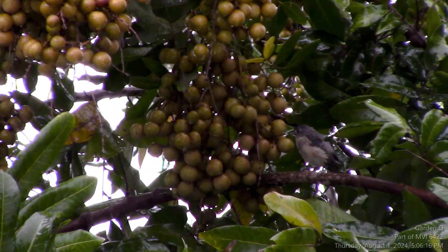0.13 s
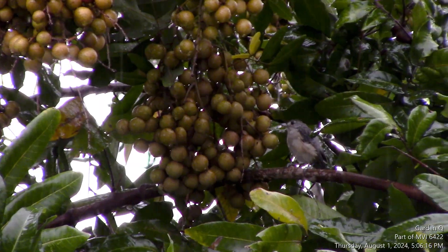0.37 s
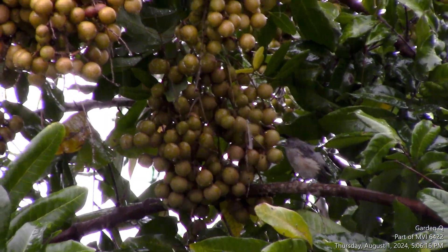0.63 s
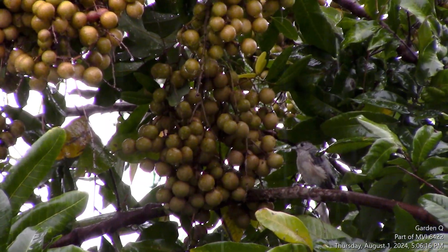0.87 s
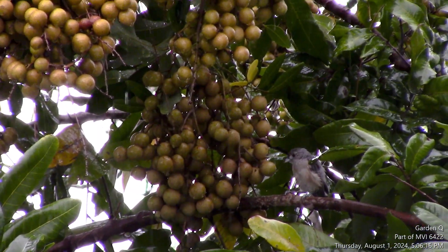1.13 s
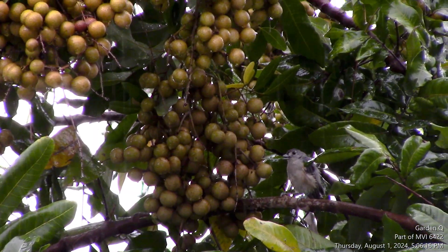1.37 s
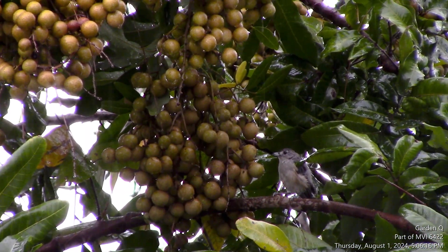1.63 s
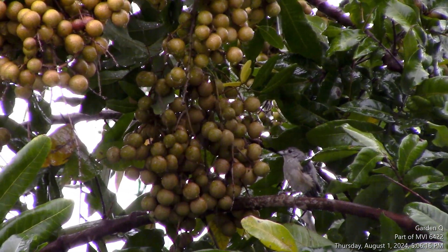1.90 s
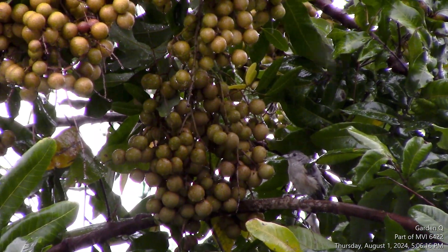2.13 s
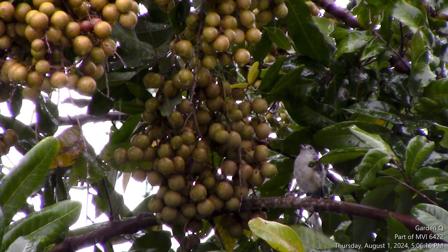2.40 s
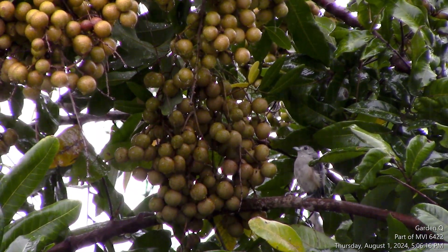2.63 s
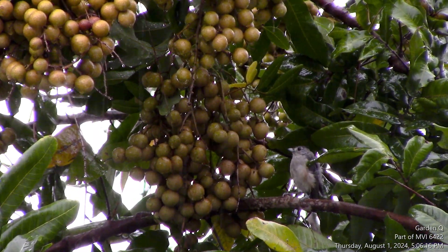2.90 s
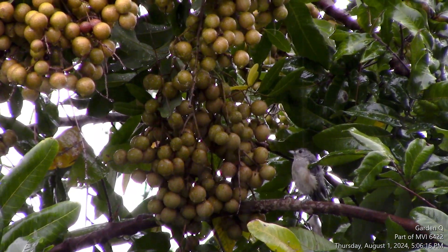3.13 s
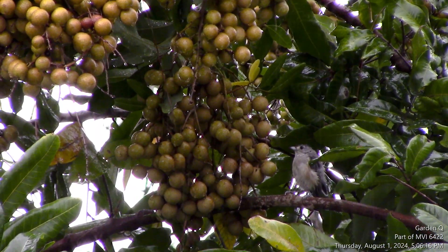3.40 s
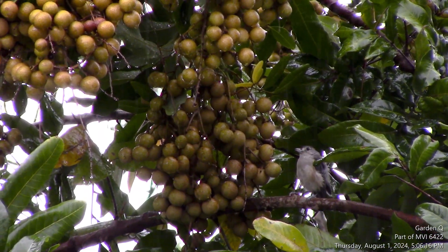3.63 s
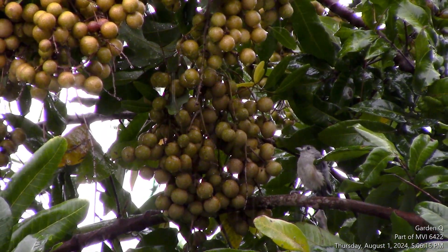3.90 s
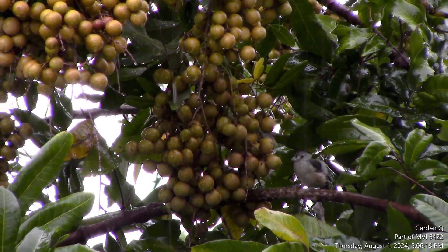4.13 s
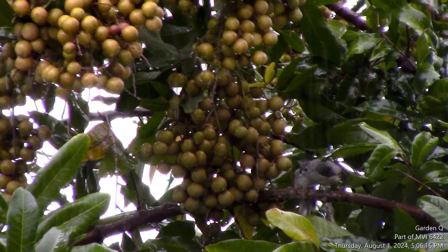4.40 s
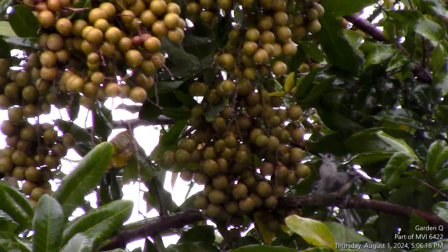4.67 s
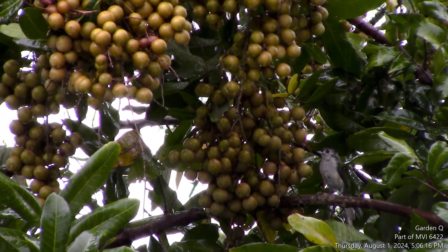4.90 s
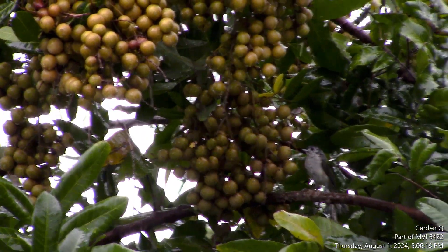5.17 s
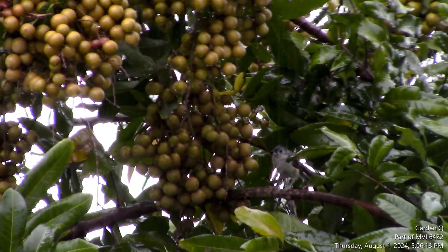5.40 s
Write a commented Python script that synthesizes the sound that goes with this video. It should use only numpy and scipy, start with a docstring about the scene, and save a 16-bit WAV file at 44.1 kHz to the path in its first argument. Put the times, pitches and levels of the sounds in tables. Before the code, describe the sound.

A small bird gives sharp, high falling chips and one brief thin whistle over steady light rain hissing on leaves in a yard.

```python
"""After a short silence, light rain on foliage fades in: a hiss of noise and grains, surging in octave bands.
Under it lies a faint low drone, noise through narrow resonances. Drops soon tick on near leaves, clicks
with a spray of echoes. From about two seconds a small bird in a fruit tree gives high chips, falling
whistles with a weak octave that echo off the walls and leaves of a yard; one long whistle comes among
the last of them. A final chip and a few more drops follow over the rain."""
import sys
import numpy as np
from scipy import signal
from scipy.fft import rfft, irfft, next_fast_len
from scipy.io import wavfile
from scipy.ndimage import uniform_filter1d

SR = 44100
rng = np.random.default_rng(int(sys.argv[2]) if len(sys.argv) > 2 else 0)


def generate_wav(sig):
    """Save sig (samples, or channels by samples) to the path in sys.argv[1] as 16-bit PCM at SR."""
    pcm = np.round(np.clip(np.atleast_2d(sig).T, -1, 1) * 32767).astype(np.int16)
    wavfile.write(sys.argv[1], SR, pcm)


def boost_factor(decibels):
    """Convert a level in decibels to a linear amplitude factor."""
    exponent = np.asarray(decibels, float) / 20
    return 10 ** exponent


N = 243873

# Wavering tones of far machinery: f/Hz, width/Hz, rms level/dB
DRONE_TONES = [(143, 7, -89), (226, 13.6, -72.5), (246.5, 13.4, -72.5), (367.5, 17, -75)]
# Swells of the rain, before the final 3 dB lift: t/s, level/dB
RAIN_SWELLS = [(0.15, -47.5), (0.40, -47.5), (0.514, -49.5), (0.60, -46.5), (0.68, -49), (0.77, -47.5),
               (1.04, -49), (1.16, -47), (1.28, -49), (1.47, -47), (1.67, -48), (2.0, -48.5), (2.11, -46.5),
               (2.21, -49), (2.31, -48), (3.14, -48), (3.77, -48.5), (3.91, -49), (4.25, -47.5),
               (4.44, -49), (4.73, -47), (5.07, -48.5), (5.22, -47), (5.35, -49), (5.53, -48)]
# Spectrum of the rain, relative density: f/Hz, level/dB per Hz
RAIN_SPECTRUM = [(30, -25), (80, -26), (130, -20), (210, -11), (300, -5), (560, -3.5), (620, -0.5),
                 (1040, -2.5), (1590, -1), (3000, -2), (6550, -7.5), (9500, -15.5), (12500, -25.5),
                 (15600, -32)]
# Stereo width of the rain: f/Hz, left-right likeness/0-1
RAIN_LIKENESS = [(60, 0.06), (150, 0.88), (380, 0.77), (950, 0.81), (2380, 0.79), (5980, 0.68),
                 (15000, 0.21)]
# Stereo balance of the rain: f/Hz, left over right/dB
RAIN_BALANCE = [(60, -3), (110, 0.5), (200, 1), (380, 1.5), (700, 1.5), (1290, 1.5), (2380, 2), (4400, 0),
                (8120, 0), (15000, 3)]
# Drops on near leaves, before softening and ringing: t/s, click level/dB, left over right/dB, softness/0-1
LEAF_DROPS = [(0.605, -35, 5, 0.76), (0.745, -35, -1, 0.5), (1.74, -37, 0, 0.7), (2.104, -36, 1.5, 0.7),
              (2.118, -35, -1, 0.67), (2.302, -38, 9, .6), (2.8005, -41, 21, 0.4), (5.101, -48, 5, .4),
              (5.2434, -34, 16, 0.2), (5.261, -34, 4, 0.8), (5.268, -36, 4, 0.7), (5.400, -42, 5, 0.4)]
# Ring of a struck leaf, before a common 9.5 dB lift: f/Hz, width/Hz, level/dB
LEAF_RING = [(2700, 1000, 0), (6240, 2200, 9), (9200, 1400, 7), (13000, 4000, -30)]
# Echo envelope of the yard, near leaves then walls further off: t after the sound/s, relative level/dB
YARD_ECHO = [(.003, -30), (.007, 1.5), (.018, -1.5), (.032, -4), (.050, -7.5), (.070, -12), (.088, -13.5),
             (.105, -22), (.3, -52)]
# Short chips: start t/s, rise/s, hold/s, level at the top of the swell/dB, settled f/Hz, fall in f/Hz
BIRD_CHIPS = [(2.143, 0.0116, 0.024, -30, 7510, 730), (2.613, .009, 0.016, -30, 7380, 475),
              (2.838, 0.017, 0.0056, -36.5, 7040, 120), (2.997, 0.017, 0.009, -43, 5706, 90),
              (3.512, 0.0098, 0.011, -36.5, 7440, 620), (4.13, 0.013, 0.019, -28, 7503, 690),
              (5.018, 0.0085, .008, -50, 6940, 100)]
# One long whistle: t/s, f/Hz, level/dB
WHISTLE = [(4.531, 8000, -53), (4.540, 7970, -40), (4.553, 8040, -32.5), (4.562, 8040, -34.5),
           (4.579, 7950, -32.5), (4.592, 7920, -39), (4.604, 7800, -33.5), (4.615, 7700, -40),
           (4.622, 7600, -49), (4.631, 7300, -52)]
# The bird turns on its branch: t/s, left over right/dB
BIRD_BALANCE = [(2.15, 2.5), (3.0, 1.5), (3.52, -1), (4.14, 2.5), (4.55, -1.5)]


def rms_one(x):
    """Scale to rms 1."""
    return x / np.sqrt(np.mean(x ** 2) + 1e-20)


def at_hz(points, hz):
    """Read a table on a log-frequency axis."""
    table_hz, values = np.transpose(points)
    return np.interp(np.log(hz), np.log(np.maximum(table_hz, 1)), values)


def pan(left_db):
    """Left and right gains for a balance in dB, left over right."""
    return boost_factor(np.array([[left_db / 2], [-left_db / 2]]))


def drift(rate_hz):
    """Slow chance: noise at every 20th sample through a double one-pole low-pass, scaled to rms 1."""
    r = np.exp(-40 * np.pi * rate_hz / SR)
    noise = rng.standard_normal(N // 20 + 2002)
    slow = signal.lfilter([1], [1, -2 * r, r * r], noise)[2000:]  # drop the filter's start-up
    return np.interp(np.arange(N) / 20, np.arange(len(slow)), rms_one(slow))


def resonance(x, hz, width_hz):
    """Two-pole band-pass with gain about 1 on top."""
    r = np.exp(-np.pi * width_hz / SR)
    poles = [1, -2 * r * np.cos(2 * np.pi * hz / SR), r * r]
    return signal.lfilter([(1 - r * r) / 2, 0, (r * r - 1) / 2], poles, x)


def yard_echoes(echo_db):
    """Densely scattered reflections, drawn anew for each sound, with total energy about echo_db per side."""
    echoes_per_s = 12000
    t = np.arange(SR // 3) / SR
    hits = rng.random((3, len(t))) < echoes_per_s / SR
    taps = rng.standard_normal((3, len(t))) * hits
    taps = taps[0] + taps[1:]  # the first row reaches both sides alike
    shape = boost_factor(np.interp(t, *np.transpose(YARD_ECHO)))
    return boost_factor(echo_db) * taps * shape / np.sqrt(np.sum(shape ** 2) * np.mean(taps ** 2))


def drone():
    """Far machinery: noise through narrow resonances gives a few wavering low tones."""
    tones = [boost_factor(db) * rms_one(resonance(rng.standard_normal(N), hz, width_hz))
             for hz, width_hz, db in DRONE_TONES]
    return sum(tones)


def rain(grains_per_s, grain_db, grain_share, surge_db, patch_db):
    """Far rain is smooth noise, nearer rain dense grains; octave bands surge partly together."""
    gust_db, gusts_per_s = -0.1, 2.4  # quicker swells at random
    level_db = np.interp(np.arange(N) / SR, *np.transpose(RAIN_SWELLS)) + gust_db * drift(gusts_per_s)
    swell_db = level_db - level_db.mean()
    treble_db = 1.05 - 0.51 * swell_db  # the top octaves are lifted and follow less of each swell

    size = next_fast_len(N)
    sizes = boost_factor(grain_db * np.minimum(rng.exponential(1, (2, size)), 5)) * rng.choice([-1, 1], (2, size))
    grains = rms_one(sizes * (rng.random((2, size)) < grains_per_s / SR))
    share = np.clip(grain_share, 0, 1)  # of the power
    smooth = rng.standard_normal((2, size))
    mid, side = rfft(np.sqrt(1 - share) * smooth + np.sqrt(share) * grains)

    hz = np.maximum(np.arange(len(mid)) * SR / size, 1)
    alike = np.clip(at_hz(RAIN_LIKENESS, hz), 0, 1)
    stereo = np.sqrt(1 + alike) * mid + np.sqrt(1 - alike) * side * [[1], [-1]]
    stereo = stereo * boost_factor(at_hz(RAIN_SPECTRUM, hz)) * boost_factor(at_hz(RAIN_BALANCE, hz) * [[.5], [-.5]])

    surge = surge_db * (drift(28) + 0.44 * drift(90))
    centres = 62.5 * 2. ** np.arange(9)
    octave = np.log2(np.clip(hz, centres[0], centres[-1]) / centres[0])
    out = 0
    for k, centre in enumerate(centres):
        slopes = np.clip(1 - abs(octave - k), 0, 1)  # overlapping slopes add up to one
        band = irfft(stereo * slopes, size)[:, :N]
        wet = np.clip(np.log2(centre / 120) / 3, 0, 1)  # the bass is distant and does not surge
        bright = np.clip(np.log2(centre / 4000), 0, 1)
        patch = patch_db * drift(11.0)  # each band also wavers by itself
        out = out + band * boost_factor(wet * (swell_db + surge) + bright * treble_db + patch)
    return boost_factor(level_db.mean() + 3.0) * rms_one(out)


def drops(echo_db, spray_t60):
    """A drop ticks on a leaf, a soft one more dully; a short spray of echoes follows, duller than the tick."""
    soft_spray_loss_db = 18  # a fully soft drop splashes this much less
    out = np.zeros((2, N + SR))
    for start_s, click_db, left_db, softness in LEAF_DROPS:
        hit = yard_echoes(echo_db - soft_spray_loss_db * softness)
        decay = boost_factor(-60 * np.arange(hit.shape[1]) / SR / spray_t60)
        hit = signal.lfilter([.3, .4, .3], [1], hit * decay)
        hit[:, 0] = -pan(left_db)[:, 0]  # the tick itself
        soft = np.clip(softness, 0, .9)
        hit = signal.lfilter([1], np.convolve([1, -soft], [1, -soft]), (1 - soft) * hit)
        start = round(start_s * SR)
        out[:, start:start + hit.shape[1]] += boost_factor(click_db) * hit
    return sum(boost_factor(db + 9.5) * resonance(out[:, :N], hz, width_hz) for hz, width_hz, db in LEAF_RING)


def chip_shape(start, rise, hold, top_db, settled_hz, fall_hz):
    """Time, pitch and level of a chip: it swells while the pitch falls, sags, and ends with a last drop."""
    onset_db, onset_bend = -52, 1.04  # every chip climbs from this level on a bent slope
    sag_db_per_s, release_s, release_db = 400, 0.008, -9
    t = np.arange(round((rise + hold + release_s) * SR)) / SR
    release = np.clip((t - rise - hold) / release_s, 0, 1)

    # the pitch lingers on top, falls, goes on sinking slowly, then drops; all as shares of the fall
    glide = np.exp(-(t / (0.79 * rise)) ** 2.5)
    hz = settled_hz + fall_hz * (glide - 4.8 * t - 0.64 * release)

    swell = (onset_db - top_db) * np.clip(1 - t / rise, 0, 1) ** onset_bend
    sag = -sag_db_per_s * np.maximum(t - rise, 0)
    return start + t, hz, top_db + swell + sag + release_db * release


def bird():
    """Each call is a gliding whistle with a weak octave; the glide beats against its own echoes."""
    clear_hz, hoarse_db_per_khz = 6630, 0.5  # below clear_hz the voice shakes
    octave_at_clear_db, octave_db_per_khz = -24.5, -14  # weaker on higher notes
    octave_steadiness = 0.35  # share of the swell and sag that the octave does not follow
    octave_blur_rad, octave_fade_db = 0.87, -10  # it is breathy and fades over the last third
    loud_db, loud_echo_db, echo_per_db = -33, -6.5, 0.3363  # fainter calls face away: more echo

    out, flutter, breathy = np.zeros((2, N + SR)), drift(320), drift(250)
    for s, hz, db in [chip_shape(*row) for row in BIRD_CHIPS] + [np.transpose(WHISTLE)]:
        start = round(s[0] * SR)
        t = np.arange(start, round(s[-1] * SR)) / SR
        span = slice(start, start + len(t))
        hz, db = [uniform_filter1d(np.interp(t, s, c), size=90) for c in (hz, db)]

        above_khz = (hz - clear_hz) / 1000
        # an unsteady voice shakes level and pitch together
        hoarse = hoarse_db_per_khz * np.maximum(-above_khz, 0) * flutter[span]
        phase = 2 * np.pi * np.cumsum(hz * (1 + 0.014 * hoarse)) / SR
        level = np.sqrt(2) * boost_factor(db + hoarse) * signal.windows.tukey(len(t), .1)  # levels are rms

        octave_db = octave_at_clear_db + octave_db_per_khz * above_khz + octave_steadiness * (db.max() - db)
        octave_db = octave_db + octave_fade_db * np.clip(np.linspace(-2, 1, len(t)), 0, 1)
        octave = boost_factor(octave_db) * np.sin(2 * phase + octave_blur_rad * breathy[span])
        call = level * (np.sin(phase) + octave)

        echoes = yard_echoes(loud_echo_db + echo_per_db * (loud_db - db.max()))
        wet = signal.fftconvolve(call[None], echoes, axes=1)
        side = pan(np.interp(s[0], *np.transpose(BIRD_BALANCE)))
        out[:, span] += call * side
        out[:, start:start + wet.shape[1]] += wet * side
    return out[:, :N]


def scene():
    """Drone, rain and drops under the bird."""
    wet_leaves = rain(grains_per_s=3000, grain_db=3.5, grain_share=0.2, surge_db=0.53, patch_db=0.42)
    return drone() + wet_leaves + drops(echo_db=17.5, spray_t60=0.2) + bird()


def band_limit(x):
    """A steep low-pass at the top of the band."""
    return signal.sosfilt(signal.butter(12, 16490, fs=SR, output="sos"), x)


def record(dry):
    """The sound fades in after a short silence; a steep low-pass cuts the top."""
    ramp = np.interp(np.arange(N) / SR, [0.078, 0.12], [0, np.pi / 2])  # s: silent until, full from
    fade = np.sin(ramp) ** 3.3
    low_pass = signal.cheby2(14, 50, 16100, fs=SR, output="sos")  # 50 dB down from 16100 Hz up
    mix = signal.sosfilt(low_pass, dry * fade)
    return band_limit(mix)


dry = scene()
out = record(dry)
generate_wav(out)
```